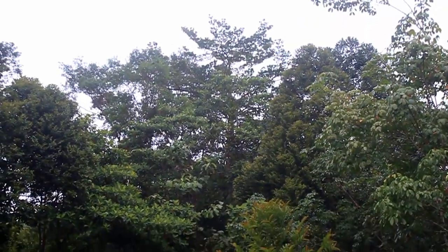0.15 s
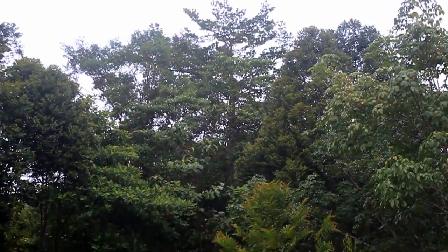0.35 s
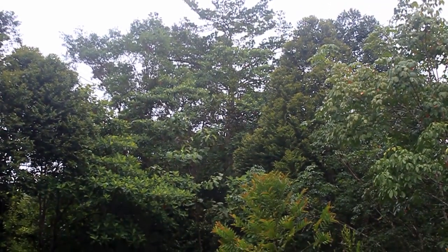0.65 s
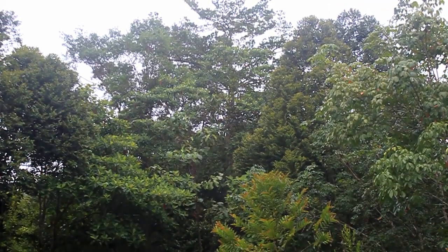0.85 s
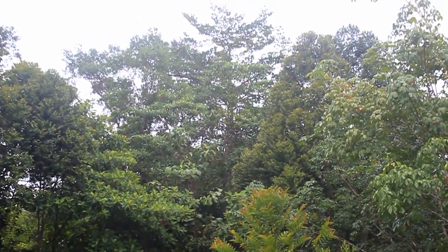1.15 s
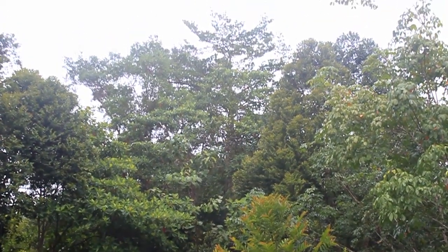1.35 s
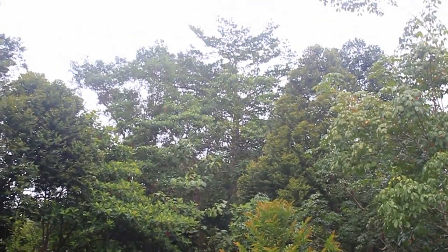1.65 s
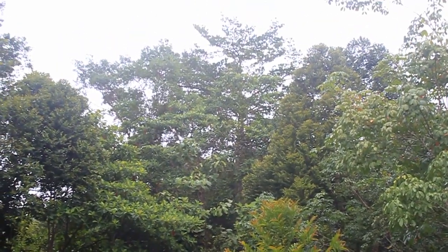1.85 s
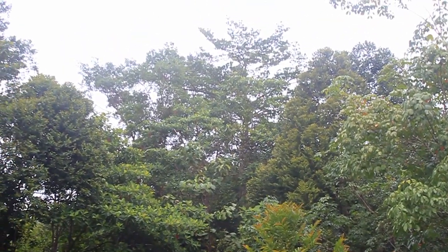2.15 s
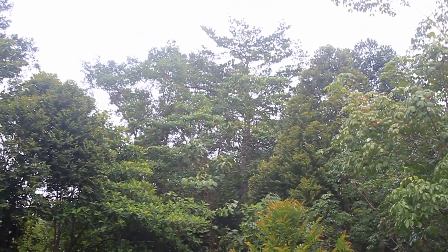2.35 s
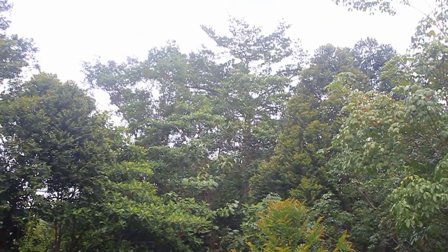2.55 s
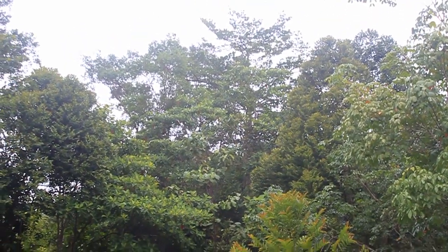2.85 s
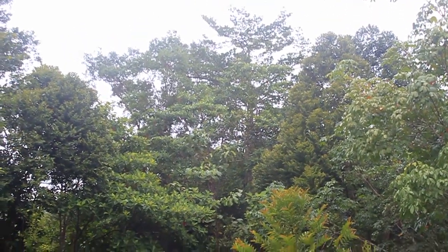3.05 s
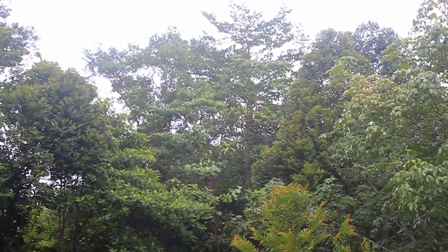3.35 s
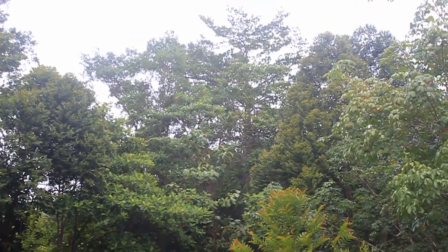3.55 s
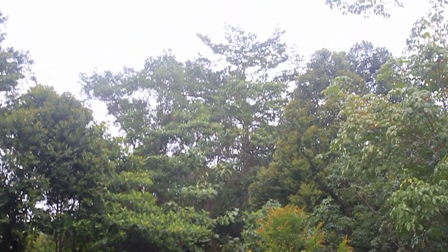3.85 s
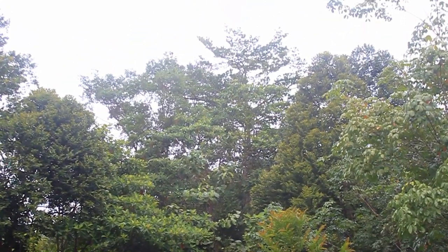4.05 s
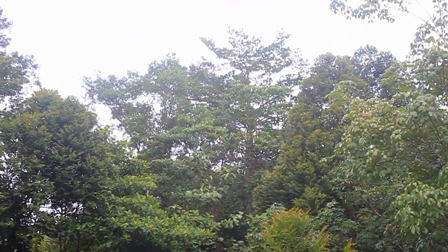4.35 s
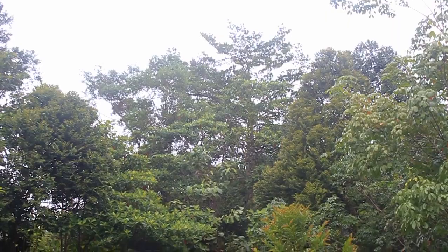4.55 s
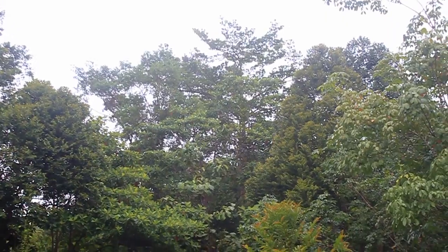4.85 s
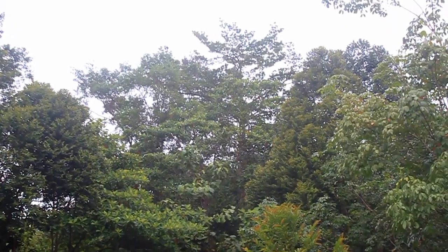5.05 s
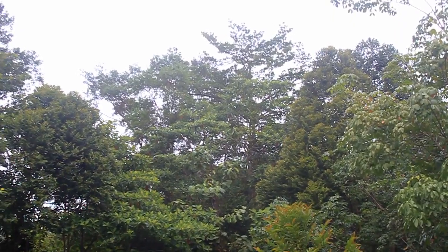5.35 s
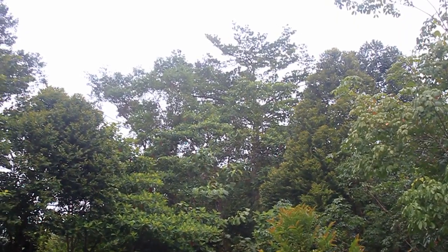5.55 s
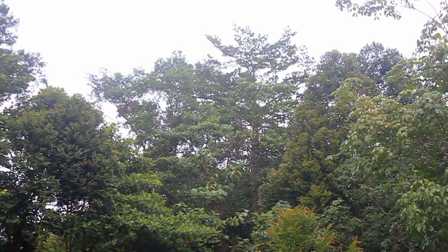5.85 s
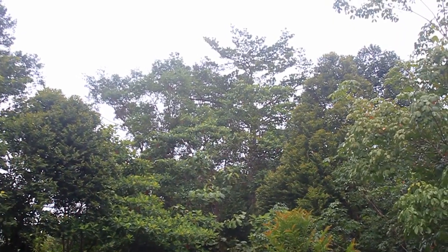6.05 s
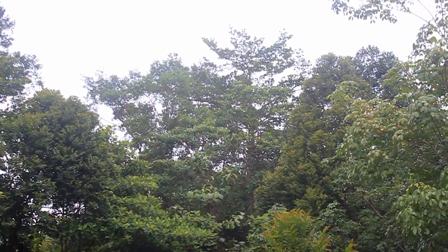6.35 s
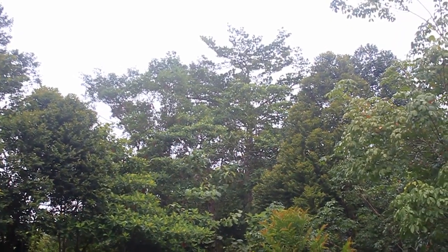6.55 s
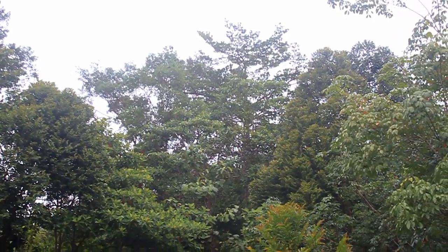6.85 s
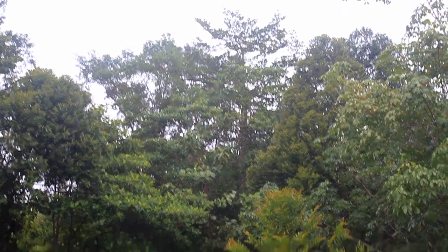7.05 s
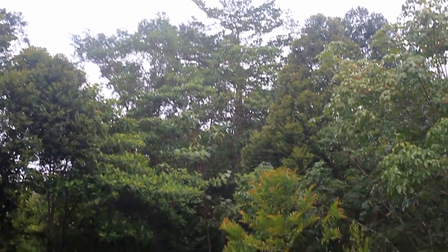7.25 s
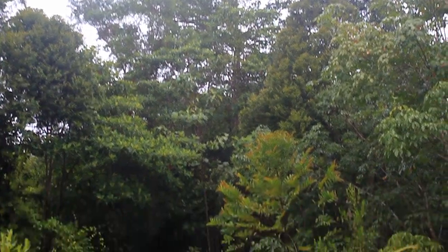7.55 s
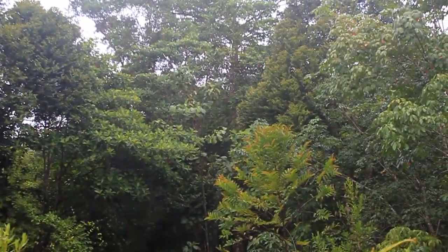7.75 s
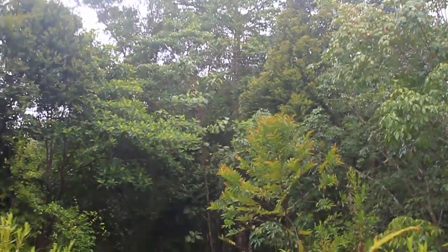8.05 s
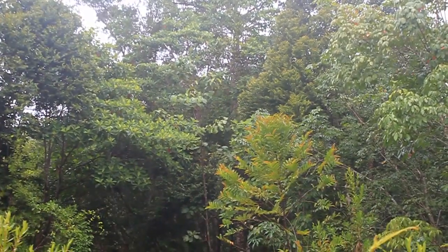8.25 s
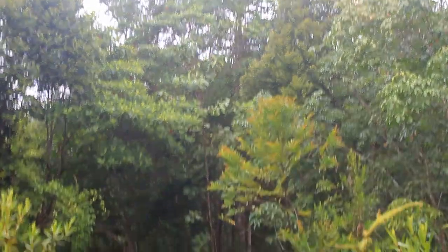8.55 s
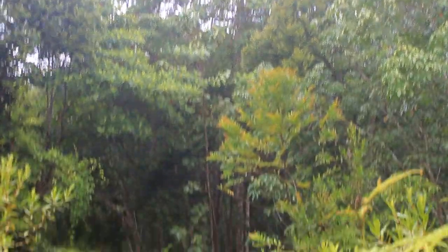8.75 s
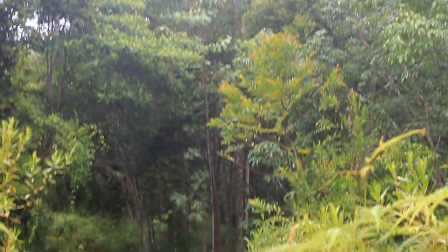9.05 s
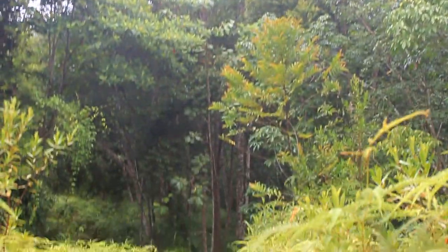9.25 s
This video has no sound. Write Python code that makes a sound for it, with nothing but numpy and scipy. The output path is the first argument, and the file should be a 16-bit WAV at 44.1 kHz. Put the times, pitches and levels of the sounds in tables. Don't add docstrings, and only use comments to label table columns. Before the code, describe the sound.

Gibbons whoop in loud overlapping pairs across a wet forest, echoing long through trees, over pulsing insects, dripping leaves and a thin whistling bird.

```python
import sys
import numpy as np
from scipy import signal
from scipy.io import wavfile
from scipy.ndimage import uniform_filter1d

SR = 44100
rng = np.random.default_rng(int(sys.argv[2]) if len(sys.argv) > 2 else 0)


def natural_amplitude(level_db):
    exponent = np.asarray(level_db, float) / 20
    return 10 ** exponent


def int16_out(signal):
    q = np.round(np.clip(np.atleast_2d(signal).T, -1, 1) * 32767)
    wavfile.write(sys.argv[1], SR, q.astype(np.int16))


N = 414981

# centre_hz, density_db_per_hz
AIR_SPECTRUM = [(15, -51.5), (25, -30), (165, -3), (261, -5.5), (1820, -3), (8000, -10.5), (9990, -14),
                (15800, -12.5)]
# centre_hz, width_hz, level_db
INSECT_CHORUS = [(5535, 440, -67), (6640, 350, -69), (7310, 290, -70)]
# start_s, end_s, level_db
SHRILL_PHRASES = [(-.2, 4.0, -67), (4.0, 5.2, -71), (5.702, 7.3, -76), (6.3, 6.6, -69), (7.9, 8.22, -69),
                  (8.85, 9, -61), (9.15, 9.6, -73)]
# start_s, end_s, first_db, last_db, end_throb_depth [0-1]
KATYDID_PHRASES = [(-.2, 0.91, -66, -52, 0.6), (0.921, 1.688, -62, -60, 0.29),
                   (1.701, 2.956, -76, -54, 0.02), (2.944, 3.943, -55, -52.5, 0.35),
                   (3.953, 4.918, -61, -55, 0.46), (4.918, 5.167, -60, -59, .3),
                   (5.177, 5.947, -67, -56, .3), (5.955, 7.053, -56.5, -54, 0.6),
                   (7.201, 8.546, -72, -53, 0.17), (8.595, 9.5, -63, -50, .4)]
# centre_hz, density_db_per_hz
KATYDID_SPECTRUM = [(9000, -40), (11300, -16), (12200, -6), (13500, -2), (14800, 0), (15800, -1)]
# time_s, level_db
CRICKET_LEVEL = [(0, -63), (.76, -59), (.82, -73), (1.3, -66), (1.45, -91), (2.3, -107), (2.42, -66.5),
                 (3.1, -63), (3.6, -59), (6, -57.5), (8.2, -57), (9.41, -54.5)]
# time_s, chirps_per_s
CRICKET_RATE = [(0.0, 6.822), (1.4, 4.551), (2.4, 7.402), (3.3, 7.109), (4.5, 6.681), (5.6, 6.696),
                (6.0, 6.481), (7.2, 6.725), (7.7, 6.481), (9.41, 6.54)]
# start_s, fine_splash_db, coarse_splash_db, leaf_ring_db
LARGE_LEAF_DRIPS = [(1.5938, -50.5, -48, -47), (1.7565, -50, -53, -51), (1.8966, -49, -59, -54),
                    (2.1097, -59, -50, -45), (2.127, -50, -39, -37), (2.1666, -47, -48, -57),
                    (2.2776, -44, -46, -50), (3.309, -52.5, -46, -45), (3.5574, -52, -51, -54),
                    (3.7407, -46, -49, -58), (3.8364, -48, -46, -52), (4.0192, -71, -56, -43),
                    (4.1405, -58, -48, -53), (4.5896, -56, -50, -47), (4.6427, -50, -44, -46),
                    (4.6862, -54, -45, -46), (6.071, -54, -62.5, -57), (6.3265, -54, -45, -44),
                    (6.3807, -54, -50, -38), (6.5, -47, -44, -52), (6.5807, -49, -42, -53),
                    (6.8562, -47, -51, -42), (7.0594, -50, -50, -71), (7.3106, -48, -73, -74),
                    (8.4043, -57.5, -52, -61), (8.9685, -51, -58, -45)]
# start_s, fine_splash_db, coarse_splash_db, leaf_ring_db
SMALL_DRIPS = [(4.9303, -48, -46.5, -48), (5.6002, -50, -58, -54), (5.676, -49, -49, -47),
               (7.357, -65, -59, -42.5), (8.5164, -63, -60, -41.5)]
# start_s, peak_db, centre_hz
BIRD_CHIPS = [(3.885, -54, 2793), (3.9197, -56, 2610), (3.9746, -50.5, 2020), (4.0731, -54, 2070),
              (4.0941, -62, 2287), (4.2014, -56, 2485), (4.3194, -56, 2555), (9.0913, -54, 2600),
              (9.114, -58, 2670), (9.1491, -50, 2850), (9.181, -54, 2630), (9.2125, -52, 2540),
              (9.2294, -58, 2900), (9.27, -54, 2840), (9.2894, -56, 2790), (9.3427, -56, 2830),
              (9.358, -54, 2520)]
# start_s, length_s, lowest_hz, closing_lift_hz, level_db
BIRD_WHISTLES = [(1.599, .58, 3440, 200, -41), (2.279, .485, 3690, 384, -41),
                 (8.445, .55, 3455, 160.5, -43.5), (9.117, .48, 3663, 390, -42)]
# centre_hz, width_hz, level_db
EARLIER_TAILS = [(830, 140, -40), (1360, 70, -50.5), (4070, 170, -64)]
# centre_hz, t60_s
FOREST_T60 = [(400, 2.26), (800, 2.72), (1200, 1.72), (2400, 1.94), (4000, 1.1), (9000, 0.2)]
# harmonic_hz, gain_db
SECOND_GAIN = [(1000, -22.5), (1400, -7), (1900, -0.5), (2450, 0.5), (2900, 8.5)]
# harmonic_hz, gain_db
MOUTH_GAIN = [(2300, -18), (2900, -3), (3500, 2), (3900, 4.5), (4500, 1.5), (5100, -2), (6200, -13),
              (8000, -44)]
# scattered_db, second_start_db, second_end_db, upper_db
WHOOP_BALANCE = [(-7.5, -8.5, -23.5, -36), (-0.5, -61.5, -6, -26), (-11.5, -15.5, -19, -41.5),
                 (-6, -13.5, -8, -35.5), (-7, -26.5, -20.5, -42), (-4.5, -36, -16, -29),
                 (-11, -11.5, -27.5, -41), (-6, -23, -13.5, -41), (-6.5, -36, -18, -20), (3, -16, -14, -45)]
# time_s, pitch_hz, effort_db
DISTANT_WHOOP = [(9.12, 894, -55), (9.15, 944, -64), (9.32, 985, -76)]
# time_s, pitch_hz, effort_db
FIRST_BOUT = [
    [(0, 528, -49), (.04, 655, -33), (.08, 980, -24), (.125, 1103, -24.5), (.175, 1146, -28),
     (.315, 1130, -31), (.345, 1018, -26), (.44, 934, -35.5), (.525, 611, -58.5)],
    [(.44, 370, -77.5), (.5, 472, -52.5), (.535, 699, -38.5), (.57, 993, -32), (.61, 1105, -28.5),
     (.635, 1163, -44.5), (.665, 1373, -36.5), (.71, 1340, -72)],
]
# time_s, pitch_hz, effort_db
SECOND_BOUT = [
    [(2.34, 484, -60), (2.39, 643, -28.5), (2.43, 928, -20), (2.46, 1020, -18.5), (2.53, 1026, -17.5),
     (2.58, 1024, -19.5), (2.62, 1053, -18), (2.645, 1123, -31), (2.665, 1060, -45)],
    [(2.685, 1523, -47), (2.7, 1310, -33), (2.72, 1204, -27.5), (2.77, 1213, -48), (2.82, 1207, -27),
     (2.86, 1215, -38), (2.89, 1189, -28), (2.96, 1124, -34.5), (3.02, 800, -41.5)],
    [(2.915, 406, -75), (2.97, 545, -35.5), (3.03, 774, -30), (3.12, 771.8, -26.5), (3.2, 758, -32),
     (3.3, 786, -36.5), (3.33, 780, -77)],
    [(3.06, 780, -22), (3.1, 1071, -42), (3.14, 1130, -34), (3.2, 1132, -35), (3.25, 1217, -43),
     (3.385, 1423, -41.5), (3.405, 1478, -88)],
]
# time_s, pitch_hz, effort_db
THIRD_BOUT = [
    [(5.865, 403, -81), (5.91, 582, -32), (5.96, 924, -21.5), (6.0, 940, -17), (6.05, 959, -16.5),
     (6.125, 990, -20), (6.16, 990, -38)],
    [(6.17, 1388, -50), (6.19, 1145, -30.5), (6.23, 1160, -23), (6.3, 1152, -26), (6.36, 1120, -29),
     (6.4, 1003, -30)],
    [(6.285, 258, -71), (6.35, 658, -33.5), (6.39, 961, -26.5), (6.42, 1100, -37), (6.53, 1092, -41)],
    [(9.335, 409, -81), (9.37, 570, -49), (9.39, 700, -26), (9.412, 850, -23)],
]


def evened(x):
    return x / np.sqrt(np.mean(x ** 2) + 1e-20)


def read(points, hz):
    f, value = np.transpose(points)
    return np.interp(np.log(hz + 1), np.log(f + 1), value)


def curves(rows):
    s, *columns = np.transpose(rows)
    t = np.arange(max(s[0], 0), s[-1], 1 / SR)
    return t, *(np.interp(t, s, c) for c in columns)


def add(mix, start_s, sound):
    part = mix[round(max(start_s, 0) * SR):][:len(sound)]
    part += sound[:len(part)]


def wobble(length, size):
    return evened(uniform_filter1d(uniform_filter1d(rng.standard_normal(length), size), size))


def resonate(x, hz, width_hz):
    turn = np.exp(2j * np.pi * hz * np.arange(len(x)) / SR)
    r = np.exp(-np.pi * width_hz / SR)
    return 2 * (turn * signal.lfilter([(1 - r) ** 2], [1, -2 * r, r * r], x / turn)).real


def noise(spectrum, patchy_db):
    frames, hz = N // 256 + 5, np.fft.rfftfreq(1024, 1 / SR)
    a, b, patches = rng.standard_normal((frames, 513, 3)).T
    patches = uniform_filter1d(patches, size=10, axis=0)
    patches = evened(uniform_filter1d(patches, size=14, axis=1))
    z = (a + 1j * b) * natural_amplitude(read(spectrum, hz)[:, None] + patchy_db * patches)
    return evened(signal.istft(z, nperseg=1024, noverlap=768)[1][:N])


def air():
    return natural_amplitude(-54) * noise(AIR_SPECTRUM, patchy_db=1.0)


def insects():
    hiss, t = rng.standard_normal(N), np.arange(N) / SR
    edge_s, idle_db = 0.12, -76.5
    gain = natural_amplitude(idle_db)
    for start_s, end_s, level_db in SHRILL_PHRASES:
        inside_s = np.minimum(t - start_s, end_s - t)
        gain = gain + natural_amplitude(level_db) * np.clip(inside_s / edge_s + 0.5, 0, 1)
    out = evened(resonate(hiss, 12620, 480)) * gain * natural_amplitude(1.5 * wobble(N, size=3000))
    for hz, width_hz, level_db in INSECT_CHORUS:
        out = out + natural_amplitude(level_db) * evened(resonate(hiss, hz, width_hz))
    return out


def katydid():
    t, gain = np.arange(N) / SR, np.zeros(N)
    for start_s, end_s, first_db, last_db, depth in KATYDID_PHRASES:
        u = np.clip((t - start_s) / (end_s - start_s), 0, 1)
        throb = 1 + np.clip(depth, 0, 1) * u ** 0.7 * np.sin(2 * np.pi * 32.0 * (end_s - t))
        swell_db = last_db + (first_db - last_db) * (1 - u) ** 1.3
        gain += natural_amplitude(swell_db) * throb * (u > 0) * (u < 1)
    return uniform_filter1d(gain, size=500) * noise(KATYDID_SPECTRUM, patchy_db=-0.5)


def cricket():
    t = np.arange(N) / SR
    within = np.cumsum(np.interp(t, *np.transpose(CRICKET_RATE))) / SR % 1
    gate = np.clip((within - 0.03) / 0.2, 0, 1) * np.clip((0.92 - within) / 0.12, 0, 1)
    strokes = np.cumsum(228 * (1 + 0.01264 * wobble(N, size=3000))) / SR
    strong_weak = np.where(strokes % 2 < 1, 1, 0.55)
    teeth = 0.36 + np.sin(np.pi * (strokes % 1)) ** 2 * strong_weak
    wing = np.sin(2 * np.pi * np.cumsum(8780 + 90 * wobble(N, size=200)) / SR)
    rasp = evened(resonate(rng.standard_normal(N), 8735, 600))
    level_db = np.interp(t, *np.transpose(CRICKET_LEVEL))
    return evened(gate * teeth * (wing + 1.3 * rasp)) * natural_amplitude(level_db)


def drips(rows, leaf_hz):
    out, t = np.zeros(N), np.arange(1500) / SR
    for start_s, fine_db, coarse_db, leaf_db in rows:
        fine, coarse = rng.standard_normal((2, len(t)))
        splash = natural_amplitude(fine_db) * evened(resonate(fine, 10300, 2600))
        splash = splash + natural_amplitude(coarse_db) * evened(resonate(coarse, 5300, 2400))
        ring_t60_s = 0.037 * natural_amplitude(0.6 * (leaf_db + 43))
        ring_hz = leaf_hz * (1 + 0.025 * rng.standard_normal())
        ring = natural_amplitude(-60 * t / ring_t60_s) * np.sin(2 * np.pi * ring_hz * t)
        click = (1 - t / 0.000093) * np.exp(-t / 0.00014)
        snap = click + 0.33 * natural_amplitude(-60 * t / 0.0029) * np.sin(2 * np.pi * 2300 * t)
        hard = 3 * natural_amplitude(0.7 * (leaf_db + 41))
        add(out, start_s, natural_amplitude(-60 * t / 0.016) * splash + natural_amplitude(leaf_db) * (ring + hard * snap))
    return out


def chips():
    out, t = np.zeros(N), np.arange(round(0.02 * SR)) / SR
    for start_s, peak_db, hz in BIRD_CHIPS:
        sweep = np.sin(2 * np.pi * hz * (0.9 * t + 4.4 * t ** 2))
        add(out, start_s, natural_amplitude(peak_db + 0.5) * np.hanning(len(t)) * sweep)
    return out


def whistle(length_s, low_hz, lift_hz, level_db):
    t = np.arange(0, length_s, 1 / SR)
    left_s = length_s - t
    drop_hz, drop_s, lift_s, flick_hz, flick_s = 780, 0.056, 0.08, 634, 0.0123
    hz = low_hz + drop_hz * np.exp(-t / drop_s) + lift_hz * np.exp(-left_s / lift_s)
    hz = hz + flick_hz * np.exp(-np.maximum(left_s - flick_s, 0) / flick_s)
    onset_db = -10 * np.clip(1 - t / 0.03, 0, 1)
    high_db = -5 * (hz - low_hz) / 1000
    gain = natural_amplitude(level_db + onset_db + high_db + 2.6 * wobble(len(t), size=350))
    return gain * np.sin(2 * np.pi * np.cumsum(hz) / SR) * signal.windows.tukey(len(t), 0.04)


def earlier_tails():
    fading = natural_amplitude(-60 * np.arange(N) / SR / 0.69) * rng.standard_normal(N)
    out = np.zeros(N)
    for hz, width_hz, level_db in EARLIER_TAILS:
        out += natural_amplitude(level_db) * np.sqrt(SR / width_hz / 3) * resonate(fading, hz, width_hz)
    return out


def forest(x, onset_s, early_t60_s, early_db):
    t, out = np.arange(2 * SR) / SR, np.zeros(N)
    shares = np.array([wobble(N, size=2200) for _ in range(4)])
    for share in shares / np.linalg.norm(shares, axis=0):
        hz, frame_s, z = signal.stft(rng.standard_normal(2 * SR), SR, nperseg=512)
        slow = natural_amplitude(-60 * frame_s / read(FOREST_T60, hz)[:, None])
        quick = natural_amplitude(early_db - 60 * frame_s / early_t60_s)
        tail = signal.istft(z * (slow + quick), SR, nperseg=512)[1][:len(t)]
        lumps = natural_amplitude(2.8 * wobble(len(tail), size=700))
        tail = tail * lumps * (1 - np.exp(-t / onset_s))
        out += share * signal.fftconvolve(x, tail / np.linalg.norm(tail))[:N]
    return out


def whoop(rows, second_db, second_end_db, upper_db):
    t, hz, effort_db = curves(rows)
    hz = uniform_filter1d(hz, size=700, mode="nearest")
    phase = 2 * np.pi * np.cumsum(hz * (1 + 0.002 * wobble(len(t), size=300))) / SR
    glide_hz = np.gradient(hz)

    peak_before_db = np.maximum.accumulate(effort_db)
    peak_after_db = np.maximum.accumulate(effort_db[::-1])[::-1]
    held_db = np.minimum(peak_before_db, peak_after_db)
    rich_db = np.linspace(second_db, second_end_db, len(t)) + held_db - effort_db
    rich_db = rich_db + read(SECOND_GAIN, 2 * hz)
    rich_db = rich_db - 0.5 * uniform_filter1d(np.maximum(-glide_hz, 0), size=400) * SR / 1000
    second = natural_amplitude(rich_db + 2.85 * wobble(len(t), size=400)) * np.sin(2 * phase)

    upper = np.zeros(len(t))
    for k in range(3, 7):
        harmonic_db = read(MOUTH_GAIN, k * hz) - 3 * max(k - 4, 0) + 3.7 * wobble(len(t), size=500)
        upper += natural_amplitude(harmonic_db) * np.sin(k * phase)
    steady = np.exp(-uniform_filter1d(abs(glide_hz), size=900) * SR / 2500)
    upper = upper * natural_amplitude(upper_db + 0.5 * (effort_db - effort_db.max())) * steady

    gain = np.sqrt(2) * natural_amplitude(effort_db + 0.54 * wobble(len(t), size=500))
    gain = gain * np.minimum((t - t[0]) / 0.0041, 1) * np.minimum((t[-1] - t) / 0.0028, 1)
    return gain * (np.sin(phase) + second * steady ** 0.16), gain * upper


def scene():
    apes, scattered, bird = np.zeros(N), np.zeros(N), np.zeros(N)
    whoops = FIRST_BOUT + SECOND_BOUT + THIRD_BOUT
    for rows, (wet_db, *overtones_db) in zip(whoops, WHOOP_BALANCE):
        voice, upper = whoop(rows, *overtones_db)
        add(apes, rows[0][0], voice + natural_amplitude(-5) * upper)
        add(scattered, rows[0][0], natural_amplitude(wet_db) * voice + upper)
    distant, _ = whoop(DISTANT_WHOOP, second_db=-33, second_end_db=-30, upper_db=-60)
    add(scattered, DISTANT_WHOOP[0][0], distant)
    for start_s, *shape in BIRD_WHISTLES:
        add(bird, start_s, whistle(*shape))

    apes = apes - 1.14 * resonate(apes, 865, 130)
    bug, chatter = cricket(), chips()
    near = natural_amplitude(-9) * bug + natural_amplitude(-2) * chatter
    hidden = natural_amplitude(-4) * resonate(bird, 3500, 1500)
    wet = forest(scattered + natural_amplitude(-4.0) * bird + near, onset_s=0.0041, early_t60_s=1.0, early_db=6.5)
    background = air() + insects() + katydid() + earlier_tails()
    drops = drips(LARGE_LEAF_DRIPS, leaf_hz=991) + drips(SMALL_DRIPS, leaf_hz=1370)
    return (background + bug + drops + chatter + hidden + wet + apes)[None]


def top_cut(x):
    return signal.sosfilt(signal.butter(12, 16720, fs=SR, output="sos"), x)


def record(dry):
    edge_hz = 15740
    lowpass = signal.firwin(1023, edge_hz, window=("kaiser", 9), fs=SR)
    banded = signal.oaconvolve(dry, lowpass[None], "same")
    return top_cut(banded)


dry = scene()
out = record(dry)
int16_out(out)
```